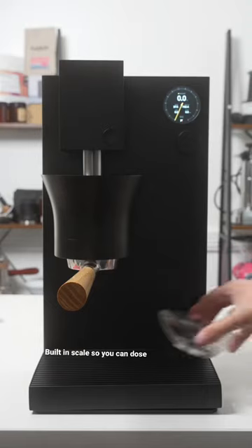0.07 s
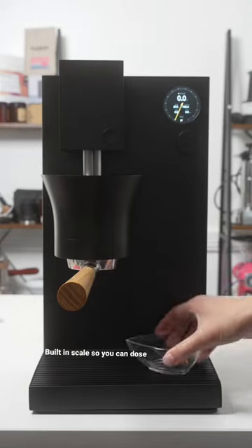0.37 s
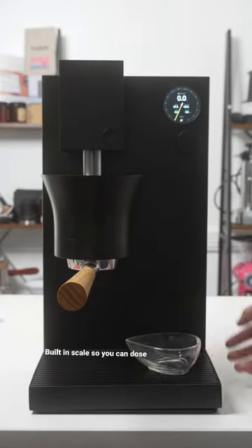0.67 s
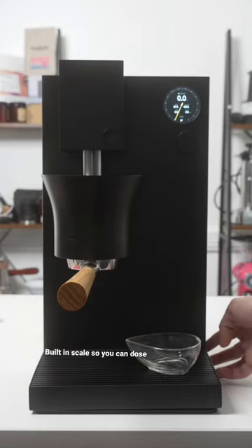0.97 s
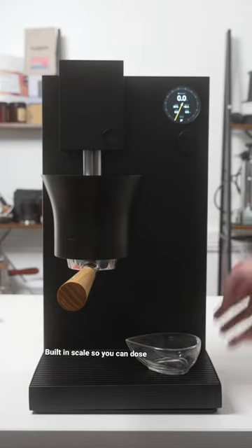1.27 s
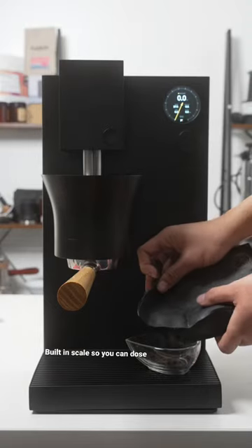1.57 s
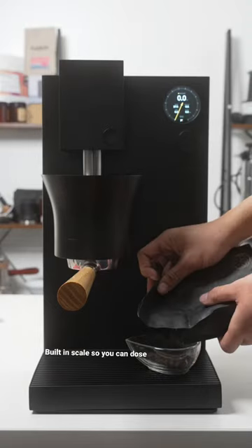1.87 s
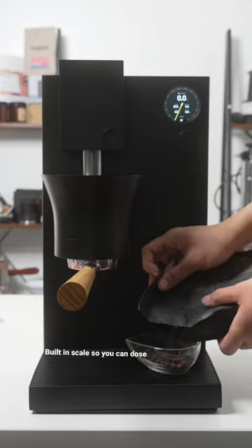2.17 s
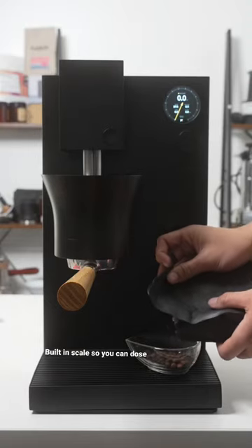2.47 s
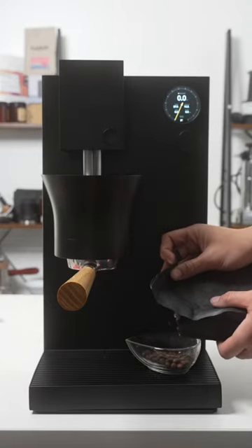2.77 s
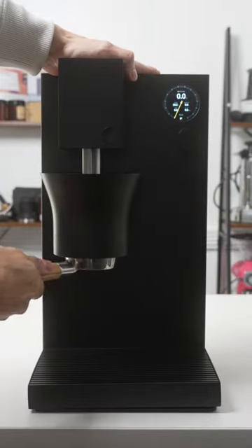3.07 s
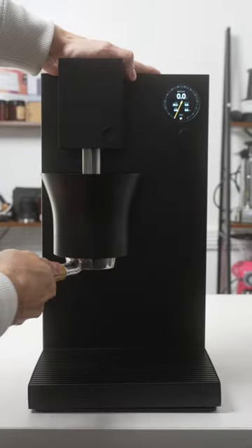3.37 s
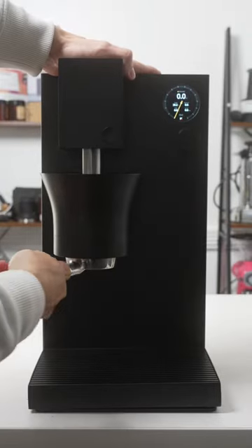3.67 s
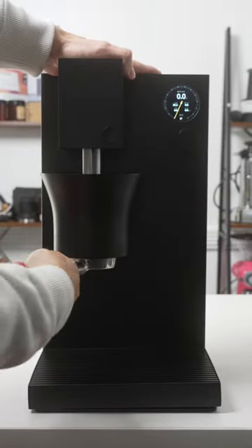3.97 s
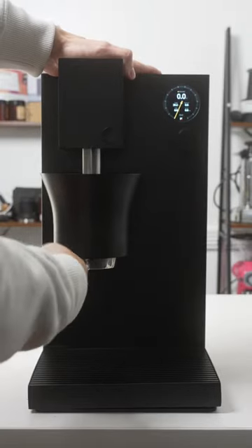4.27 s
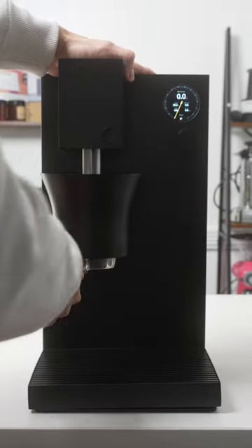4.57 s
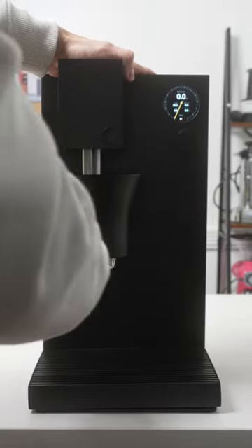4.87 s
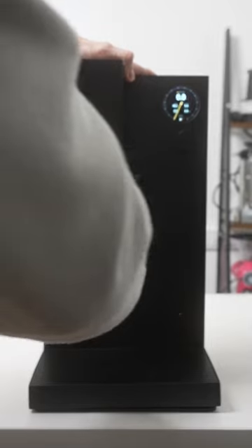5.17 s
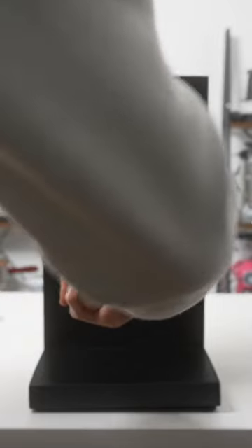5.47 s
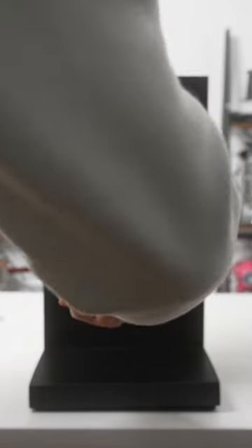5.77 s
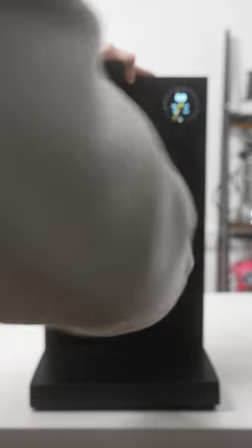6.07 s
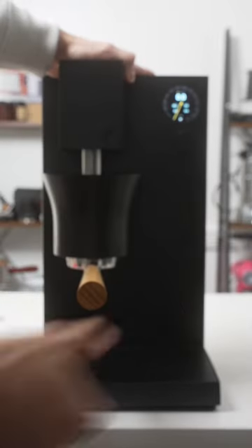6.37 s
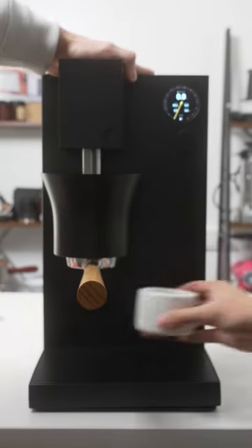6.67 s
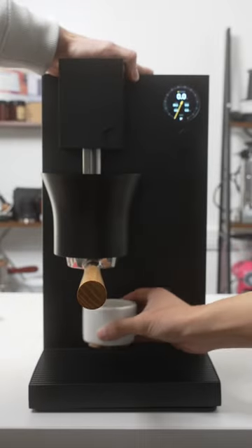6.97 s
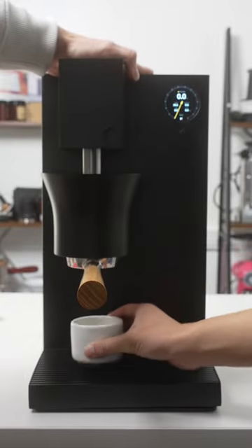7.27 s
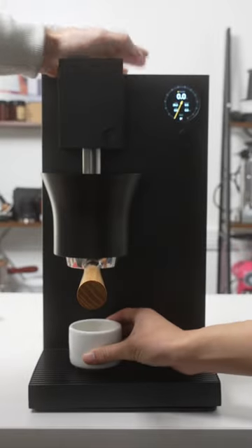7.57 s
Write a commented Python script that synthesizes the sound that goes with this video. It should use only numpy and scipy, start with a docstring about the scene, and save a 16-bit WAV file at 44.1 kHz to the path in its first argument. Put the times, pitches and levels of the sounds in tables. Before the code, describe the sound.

A faint, brief hiss opens the sound. At about 0.2 seconds a small glass dish clatters onto an espresso machine's drip tray, the loudest impact, rocking to rest with a faint ring. A button clicks down and up at around 1.1 and 1.2 seconds. From 1.5 to 2.6 seconds coffee beans slide off a scoop and patter into the dish with bright glassy clinks, thinning to a trickle. Near 2.9 seconds a metal portafilter knocks several times quickly in its holder, and the machine gives a low thump. From about 3.6 to 6.7 seconds a sleeve rustles softly among light finger taps, with a tiny rising handle squeak at 5.1 and a stronger rub and bump near 5.5. At 7.4 seconds a china cup clinks onto the tray and settles. Everything sounds close, in a quiet room with a faint, steady fan.

```python
"""A brief hiss, then a small glass dish clatters onto an espresso machine's drip tray in a quiet room.
A button clicks. Coffee beans slide off a scoop and patter into the dish, a shower of tiny impacts
that excites the modes of the glass. The portafilter knocks in its holder, the machine thumps, a sleeve
rustles, the handle squeaks by stick-slip friction, and a china cup lands on the tray.
Each knock is an impulse followed by damped free vibration; a distant fan sounds throughout."""
import sys
import numpy as np
from scipy import signal
from scipy.fft import rfft, irfft, next_fast_len
from scipy.io import wavfile

SR = 44100
rng = np.random.default_rng(int(sys.argv[2]) if len(sys.argv) > 2 else 0)


def digitize_waveform(pressure):
    """Quantize a signal to 16-bit integers and store it at the path in sys.argv[1].

    Rows of a 2-D input are taken as channels; values are limited to [-1, 1].
    """
    field = np.atleast_2d(pressure).T
    bounded = np.clip(field, -1, 1)
    quanta = np.round(bounded * 32767).astype(np.int16)
    wavfile.write(sys.argv[1], SR, quanta)


N = 340452
TIME = np.arange(N) / SR
AGE = np.arange(SR) / SR  # seconds since an impact


def amp(db):
    """Amplitude ratio of a level in decibels."""
    return 10 ** (np.asarray(db) / 20)


def unit(x):
    """Normalisation to rms 1."""
    return x / np.sqrt(np.mean(x ** 2) + 1e-20)


def unit_hit(x):
    """Normalisation to the energy of 10 ms at rms 1."""
    return x / np.sqrt(np.sum(x ** 2) / (SR / 100) + 1e-20)


def read(points, hz):
    """Interpolation of (f/Hz, value) rows over log frequency."""
    f, value = np.transpose(points)
    return np.interp(np.log(hz + 1), np.log(f + 1), value)


def since(s):
    """Time elapsed since s, zero before it."""
    return np.maximum(TIME - s, 0)


def ramp(s, rise_s):
    """Linear rise from 0 to 1, starting at time s."""
    return np.minimum(since(s) / max(rise_s, 1e-4), 1)


def swell(middle_s, length_s):
    """Raised-cosine envelope."""
    return np.cos(np.pi * np.clip((TIME - middle_s) / length_s, -.5, .5)) ** 2


def burst(s, rise_s, length_s, fall_db_per_s):
    """Exponential decay with equal linear attack and release."""
    return ramp(s, rise_s) * amp(-fall_db_per_s * since(s)) * (1 - ramp(s + length_s, rise_s))


def fade(t60):
    """Exponential decay, 60 dB in t60 seconds."""
    return np.exp(-np.log(1000) * AGE / max(t60, 1e-4))


def add(mix, s, sound):
    """Superposition of a sound starting at time s."""
    part = mix[round(s * SR):][:len(sound)]
    part += sound[:len(part)]


def colour(x, spectrum, tilt_db=0):
    """Minimum-phase filter with the given spectrum, tilted per octave."""
    hz = abs(np.fft.fftfreq(4096, 1 / SR))
    octaves = np.log2(np.maximum(hz, spectrum[0][0]))
    log_gain = np.log(amp(read(spectrum, hz) + tilt_db * octaves))
    taps = np.fft.ifft(np.exp(np.conj(signal.hilbert(log_gain)))).real
    return signal.oaconvolve(x, taps[:len(taps) // 2])[:len(x)]


def resonate(x, hz, width_hz):
    """Forced response of a unit-gain resonator of fixed or moving frequency."""
    phasor = np.exp(2j * np.pi * np.cumsum(hz * np.ones(N)) / SR)
    pole = np.exp(-np.pi * width_hz / SR)
    return 2 * (phasor * signal.lfilter([1 - pole], [1, -pole], x / phasor + 1e-18)).real


def ring(modes, tilt_db=0, scatter_db=2):
    """Free vibration: damped modes whose balance depends on the point struck."""
    offsets_db = scatter_db * rng.standard_normal(len(modes))
    return sum(amp(db + offset + tilt_db * np.log2(hz / 1500)) * fade(t60) * np.sin(2 * np.pi * hz * AGE)
               for (hz, db, t60), offset in zip(modes, offsets_db))


def knocks(blows, spectrum, modes, ring_db, snap, shiver_db, shiver_t60):
    """Impact response: an impulse, a crack of dense modes, a shiver of the housing, a few long modes."""
    out = np.zeros(N)
    for s, db, tilt_db, t60 in blows:
        crack = unit_hit(rng.standard_normal(SR) * fade(t60))
        shiver = unit_hit(rng.standard_normal(SR) * fade(shiver_t60))
        contact = snap * unit_hit(signal.unit_impulse(SR)) + crack + amp(shiver_db) * shiver
        body = unit_hit(colour(contact, spectrum, tilt_db))
        add(out, s, amp(db) * (body + amp(ring_db) * ring(modes, tilt_db / 2)))
    return out


def grains(spectrum, per_s, spread_db, band_hz, cycles):
    """Shot noise at rms 1: random tiny collisions, each dying away in a number of cycles."""
    out = np.zeros(N)
    pitches = np.geomspace(*band_hz, 32)
    for hz in pitches:
        when, chance = rng.random((int(per_s / len(pitches) * N / SR), 2)).T
        size = amp(spread_db * np.minimum(-np.log(1 - chance), 3))
        t = AGE[AGE < min(cycles / hz, .05)]
        decay = np.exp(-np.log(1000) * t * hz / cycles)
        grain = rng.choice([-1, 1]) * hz * decay * np.sin(2 * np.pi * hz * t)
        samples = (when * N).astype(int)[:, None] + np.arange(len(t))
        out += np.bincount(samples.ravel(), np.outer(size, grain).ravel(), N)[:N]
    return unit(colour(out, spectrum))


# Reverberation time: f/Hz, T60/s
REVERB_TIMES = [(100, 0.59), (400, 0.41), (1000, 0.29), (3000, 0.35), (6000, 0.19), (12000, 0.24)]
def room(x, wet_db):
    """Reverberation: sparse reflections whose treble is absorbed first."""
    reflections = rng.choice([-1., 1.], SR) * (rng.random(SR) < .1) * (AGE > .004)
    hz, t, spectra = signal.stft(reflections, SR, nperseg=256)
    decay = np.exp(-np.log(1000) * t / read(REVERB_TIMES, hz)[:, None])
    tail = signal.istft(spectra * decay, SR, nperseg=256)[1]
    return x + amp(wet_db) * signal.oaconvolve(x, tail / np.linalg.norm(tail))[:N]


# Room tone: f/Hz, level/dB
AIR_SPECTRUM = [(15, -49.5), (25, -10.5), (59, -18), (99, -7), (185, -10), (263, -5), (326, -13.5),
                (427, -7), (503, -11), (754, -7), (988, -13.5), (1160, -6), (2550, -22), (4250, -25.5),
                (16000, -31)]
# Fan resonances: f/Hz, width/Hz, level/dB
FAN_BANDS = [(361, 49, -76.5), (440, 51, -76), (766, 30, -76.5), (1140, 140, -90), (4270, 590, -80.5),
             (5460, 340, -85.5)]
def room_tone():
    """Stationary noise: a broad floor plus the resonance bands of a distant fan."""
    out = amp(-63.5) * unit(colour(rng.standard_normal(N), AIR_SPECTRUM))
    size = next_fast_len(N, True)
    bins = np.fft.rfftfreq(size, 1 / SR)
    for hz, width, db in FAN_BANDS:
        band = rfft(rng.standard_normal(size)) / (1 + (2 * (bins - hz) / width) ** 2)
        out += amp(db) * unit(irfft(band, size)[:N])
    return out


# Opening hiss: f/Hz, level/dB
HISS_SPECTRUM = [(1000, -26), (3200, -1), (4500, 5), (5600, 13.5), (6400, 4), (7300, -5), (11000, -14.5),
                 (15000, -39)]
def hiss():
    """A brief band of high noise in exponential decay."""
    noise = unit(colour(rng.standard_normal(N), HISS_SPECTRUM))
    return amp(-51) * burst(.035, rise_s=.004, length_s=.13, fall_db_per_s=115) * noise


# Soft rub and fine swish of cloth: f/Hz, level/dB
RUB_SPECTRUM = [(70, -25.5), (160, -1.5), (260, -9.5), (350, -6.5), (430, -3), (510, 5.5), (620, -5.5),
                (760, 4.5), (900, -9.5), (1200, -9.5), (1700, -27), (4000, -25)]
SWISH_SPECTRUM = [(900, -37), (1800, 2), (3000, 1), (4800, -4), (7000, -20), (15000, -23)]
# Strokes of sleeve and hands: middle t/s, length/s, rub level/dB, swish level/dB
SLEEVE_STROKES = [(3.894, 0.26, -60, -68.5), (4.06, .14, -62, -73), (4.31, .16, -62.5, -71),
                  (4.733, 0.15, -63.5, -70.5), (4.843, 0.15, -58, -69), (4.974, 0.2, -56.5, -64.5),
                  (5.27, 0.16, -55, -61), (5.386, .14, -55, -66), (5.471, 0.15, -47.5, -57),
                  (5.663, 0.13, -62, -69.5), (6.1, 0.23, -67, -70), (6.37, 0.11, -67, -65.5),
                  (6.674, .18, -69, -68.5)]
def sleeve():
    """Friction noise: cloth rubs softly while its fibres catch in a fine swish."""
    rub = grains(RUB_SPECTRUM, per_s=1500, spread_db=3, band_hz=(85.3, 4030), cycles=12.7)
    swish = grains(SWISH_SPECTRUM, per_s=2000, spread_db=3, band_hz=(1055, 15200), cycles=16)
    return sum(swell(s, length) * (amp(rub_db) * rub + amp(swish_db) * swish)
               for s, length, rub_db, swish_db in SLEEVE_STROKES)


# Fingers and cuff: t/s, level/dB, tilt/(dB/octave), crack T60/s
TOUCH_IMPACTS = [(.645, -67, 7, 0.082), (.879, -65.5, 12, 0.03), (3.636, -66, 9.5, .04),
                 (3.908, -54, -4, .04), (4.288, -58, 4.5, 0.051), (5.428, -47.5, 0.5, 0.21),
                 (5.675, -63.5, 12, .02), (5.954, -59.5, -4.5, .04), (6.154, -62, 4, .03),
                 (6.522, -63, 9, 0.017)]
# Contact spectrum: f/Hz, level/dB
TOUCH_SPECTRUM = [(80, -1), (200, -20), (600, 6), (1300, -8), (3000, -8.5), (7000, -23), (16000, -41)]
# Modes of the touched surface: f/Hz, level/dB, T60/s
TOUCH_RING = [(472, -8, 0.17), (756, 6.5, 0.12), (1144, 0.5, 0.17), (2940, -18, .06)]
def touches():
    """Weak impacts of fingers and cuff excite a few damped modes."""
    return knocks(TOUCH_IMPACTS, TOUCH_SPECTRUM, TOUCH_RING,
                  ring_db=-6.5, snap=.45, shiver_db=-6, shiver_t60=.12)


def handle_squeak():
    """Stick-slip friction: uneven slips drive two resonances that rise as the handle turns."""
    start_s, length_s, slips_per_s = 5.118, .088, 2500
    start_hz, glide_hz_per_s = 1690, 4400
    slips = rng.standard_normal(N) * (rng.random(N) < slips_per_s / SR)
    pitch = start_hz + glide_hz_per_s * np.minimum(since(start_s), length_s)
    tone = resonate(resonate(slips, pitch, width_hz=800), pitch, width_hz=800)
    overtone = resonate(slips, pitch * 1.4, width_hz=140)
    envelope = burst(start_s, rise_s=.024, length_s=length_s, fall_db_per_s=110)
    return amp(-53) * envelope * unit(tone + .84 * overtone)


# Blows to the machine's body: t/s, level/dB, tilt/(dB/octave), crack T60/s
BODY_IMPACTS = [(3.0175, -33, -1, 0.077), (3.029, -53, -9, 0.056), (3.29, -58, 4.5, 0.071),
                (5.445, -58, -1.5, 0.092), (5.495, -47.5, 3, 0.064), (6.1, -59, -1.5, 0.2)]
# Thump spectrum: f/Hz, level/dB
BODY_SPECTRUM = [(40, 11), (80, -32), (160, 11), (250, -7), (360, 7.5), (600, -11), (1500, -43),
                 (6000, -54)]
# Body modes: f/Hz, level/dB, T60/s
BODY_RING = [(80, -13, .22), (128, -8, .2), (160, -12, .65), (176, -13, .17), (358, -10, .16)]
def machine_thumps():
    """The machine's body answers each blow in its low modes."""
    return knocks(BODY_IMPACTS, BODY_SPECTRUM, BODY_RING,
                  ring_db=4, snap=.78, shiver_db=-3, shiver_t60=.32)


# Press and release: t/s, level/dB, tilt/(dB/octave), crack T60/s
BUTTON_IMPACTS = [(1.0695, -31, 1, 0.0092), (1.19, -56.5, -1.5, .016), (1.2122, -36.5, -1.5, 0.0042)]
# Click spectrum: f/Hz, level/dB
BUTTON_SPECTRUM = [(100, -48), (350, -16), (750, -0.5), (1050, -7), (1700, 0), (2600, -15), (3400, -7.5),
                   (4000, -9.5), (6200, -5.5), (7500, -19), (10000, -21), (11600, -14), (13000, -25),
                   (16000, -24)]
# Button modes: f/Hz, level/dB, T60/s
BUTTON_RING = [(730, -15, .07), (790, -17, .06), (1260, -15, .045), (1690, -5, .03), (6230, -13, .035),
               (11600, -22, .07)]
def button_clicks():
    """Heavy damping cuts the button's impacts down to clicks."""
    return knocks(BUTTON_IMPACTS, BUTTON_SPECTRUM, BUTTON_RING,
                  ring_db=-.5, snap=.43, shiver_db=-5, shiver_t60=.055)


# Portafilter against holder: t/s, level/dB, tilt/(dB/octave), crack T60/s
HOLDER_IMPACTS = [(2.884, -57, -10, .06), (2.903, -43.5, -9.5, 0.054), (2.9152, -28.5, 3, 0.023),
                  (2.922, -29, 0.5, 0.048), (2.9275, -33, -5.5, 0.061), (2.957, -42, -9, 0.059),
                  (3.003, -44, 3.5, 0.07), (3.0168, -31.5, -1, 0.0013), (3.0345, -48, 9, 0.006),
                  (3.047, -41, 1, 0.019)]
# Contact spectrum: f/Hz, level/dB
HOLDER_SPECTRUM = [(60, -40), (160, -12), (240, -23), (420, -1), (650, 0), (1250, 9.5), (2000, 0.5),
                   (2900, -0.5), (3800, -9), (4750, 1), (6000, -17.5), (9500, -36), (12000, -30),
                   (16000, -50)]
# Modes of portafilter and holder: f/Hz, level/dB, T60/s
HOLDER_RING = [(415, -11, .22), (517, -9, .13), (760, -11, .12), (1240, -11, .16), (1561, -17, .17),
               (2202, -26, .2), (2864, -29, .2), (4715, -9, .03)]
def portafilter():
    """Impact excitation: the portafilter meets its holder in a quick run of knocks."""
    return knocks(HOLDER_IMPACTS, HOLDER_SPECTRUM, HOLDER_RING,
                  ring_db=0, snap=.53, shiver_db=-7.5, shiver_t60=.031)


# Cup against tray: t/s, level/dB, tilt/(dB/octave), crack T60/s
CUP_IMPACTS = [(7.3946, -36, 7.5, 0.013), (7.3968, -37.5, -2, 0.014), (7.402, -39, -2, 0.058),
               (7.421, -39.5, -4, 0.036), (7.465, -44.5, -1.5, 0.14), (7.483, -45, -3.5, 0.035),
               (7.505, -54, -2.5, .08), (7.59, -52.5, -1, 0.52)]
# Contact spectrum: f/Hz, level/dB
CUP_SPECTRUM = [(60, -25), (190, -7), (350, 8), (550, -2), (900, 0.5), (1400, 7.5), (1900, -3.5),
                (2500, 7.5), (3100, -7.5), (4300, 1), (5300, -1), (6500, -18), (9200, -16), (16000, -36)]
# Modes of the cup on the tray, and of its hard foot: f/Hz, level/dB, T60/s
CUP_RING = [(185, -11, .14), (361, -15, .33), (877, -11, .17), (1394, -17, .22), (2487, -23, .26),
            (4177, -17, .08), (4371, -20, .17), (4657, -24, .4), (4980, -24, .25), (9141, -27, .15)]
FOOT_RING = [(5280, 6, 0.023), (5660, 1, 0.014), (6000, -17, 0.0084)]
def cup_landing():
    """Inelastic impacts settle the cup; only the first two are hard enough to make its foot chirp."""
    out = knocks(CUP_IMPACTS, CUP_SPECTRUM, CUP_RING,
                 ring_db=1.5, snap=.089, shiver_db=-.5, shiver_t60=.11)
    for s, db, _, _ in CUP_IMPACTS[:2]:
        add(out, s, amp(db + 10) * ring(FOOT_RING, scatter_db=2.5))
    return out


# Dish against tray: t/s, level/dB, tilt/(dB/octave), crack T60/s
DISH_IMPACTS = [(0.2291, -21, -0.65, 0.036), (0.2321, -29.5, 4, 0.022), (.238, -29, -2.5, 0.028),
                (0.271, -31.5, 2, 0.028), (0.2737, -32.5, -3, 0.077), (.305, -39.5, -5, 0.065),
                (0.3186, -34, -0.5, 0.074), (0.335, -39.5, -2, 0.097), (0.364, -47.5, -4.5, 0.032),
                (.408, -52.5, -3, 0.079)]
# Contact spectrum: f/Hz, level/dB
DISH_SPECTRUM = [(60, -36.5), (180, -9), (270, -17), (440, -2.5), (800, -2.5), (1100, -9), (2000, -10.5),
                 (2450, 0), (3200, -5), (4800, -16.5), (6600, -4), (8500, -27), (12500, -21), (16000, -32)]
# Joint modes of dish and tray, and the long after-ring: f/Hz, level/dB, T60/s
TRAY_RING = [(400, -28, .75), (445, -19, .38), (779, -7, .15), (859, -15, .26), (910, -12, .2),
             (1257, -18, .22), (2398, -20, .14), (2448, -11, .16), (2650, -17, .17), (3266, -20, .2),
             (3445, -20, .18), (4146, -21, .25), (5276, -28, .24), (6692, -14, .12)]
AFTER_RING = [(1475, -13, 1.1), (1556, -9, 1.6), (1707, -9, 1.0), (1800, -8, 1.2), (1826, -3, 1.25),
              (4912, -9, .7)]
def dish_landing():
    """The dish rocks to rest; lightly damped modes ring on faintly from the first impact."""
    out = knocks(DISH_IMPACTS, DISH_SPECTRUM, TRAY_RING,
                 ring_db=-1, snap=.13, shiver_db=-12.5, shiver_t60=.12)
    add(out, DISH_IMPACTS[0][0], amp(-45) * ring(AFTER_RING, scatter_db=1))
    return out


# Beans striking the glass wall: t/s, level/dB, relative twin level/dB
WALL_STRIKES = [(1.5772, -39.5, -12), (1.665, -37, -22), (1.7647, -38.5, -11), (1.792, -33, -9),
                (1.825, -31.5, -15), (1.9255, -32.5, 4.5), (2.0142, -35.5, -7), (2.1449, -39.5, -8),
                (2.1808, -42, -13), (2.3429, -41.5, -18), (2.3714, -37.5, -17), (2.396, -40, -25)]
# Modes of the glass, and their twins: f/Hz, level/dB, T60/s
GLASS_RING = [(2887, -20, .4), (4956, 0, .34), (7989, -9, .23), (10605, -19, .19), (11703, -11, .18),
              (13851, -5, .17), (15385, -6, .11)]
TWIN_RING = [(2681, -11, .22), (5286, -1, .16), (8403, -5, .11), (14578, -10, .1)]
def glass_clinks():
    """Mode splitting: the oval dish rings in two sets; the growing heap muffles the main set's highs."""
    out = np.zeros(N)
    strongest_hz = GLASS_RING[1][0]
    for s, db, twin_db in WALL_STRIKES:
        muffle_db_per_octave = 6 * np.clip((s - 2) / .4, 0, 1)
        modes = [(hz, mode_db - muffle_db_per_octave * max(np.log2(hz / strongest_hz), 0), t60)
                 for hz, mode_db, t60 in GLASS_RING]
        clink = ring(modes, scatter_db=1) + amp(twin_db) * ring(TWIN_RING, scatter_db=1.5)
        add(out, s, amp(db) * clink)
    return out


POUR_START_S, POUR_FULL_S, POUR_THIN_S, POUR_EMPTY_S, POUR_END_S = 1.453, 1.56, 2.03, 2.35, 2.63
LAND_S, LAND_RISE_S = 1.65, .11  # the stream reaches the glass and builds up there
def flow_db():
    """Flow level relative to the full stream: it swells as the scoop tips, holds, thins and stops."""
    swell_db_per_s, thin_db_per_s, stop_db_per_s = 19, 32.5, 170
    return -(swell_db_per_s * np.maximum(POUR_FULL_S - TIME, 0)
             + thin_db_per_s * since(POUR_THIN_S) + stop_db_per_s * since(POUR_EMPTY_S))


def bean_hit(hz):
    """An impulse and a brief rattle of neighbouring beans, filtered to a peak at hz."""
    t60 = .006 + 8 / hz  # low knocks outlast high snaps
    band = [(hz / 5, -34), (hz / 2, -20), (hz / 1.13, -3), (hz * .92, -6),
            (hz, 0), (hz * 1.6, -14), (hz * 9, -42)]
    rattle = unit_hit(rng.standard_normal(SR) * fade(t60))
    contact = unit_hit(signal.unit_impulse(SR)) + 1.6 * rattle
    return unit_hit(colour(contact, band))


# Snaps on glass (high) and knocks on scoop and heap (low): t/s, level/dB, f/Hz
BEAN_IMPACTS = [(1.5227, -39.5, 1200), (1.5562, -38.5, 1010), (1.5772, -33, 15200), (1.581, -39.5, 1120),
                (1.632, -44.5, 2600), (1.653, -42, 1320), (1.664, -38, 14000), (1.7075, -32, 1080),
                (1.719, -39, 3250), (1.7395, -37, 11100), (1.7495, -37, 12500), (1.7618, -37, 10500),
                (1.777, -36, 13900), (1.8268, -26.5, 14900), (1.836, -41.5, 6000), (1.891, -42, 14300),
                (1.929, -35, 14500), (1.991, -36, 14000), (2.079, -32.5, 1180), (2.0955, -43, 13500),
                (2.1805, -42, 13500), (2.271, -41.5, 13800), (2.342, -39, 13400), (2.3736, -35, 14300),
                (2.445, -49, 12300), (2.515, -54.5, 1580), (2.554, -48.5, 1400), (2.565, -54.5, 1570),
                (2.585, -51, 1660), (2.618, -54, 1900)]
def hard_beans():
    """Discrete impacts: the hardest beans stand out, and random strays re-excite the glass."""
    out, flow = np.zeros(N), flow_db()
    for s, db, hz in BEAN_IMPACTS:
        add(out, s, amp(db) * bean_hit(hz))
    strays_per_s, stray_db, spread_db = 40, -38.5, 5
    low_hz, high_hz = 9900, 15100
    span_s = POUR_EMPTY_S - LAND_S - LAND_RISE_S
    for when, size, pitch in rng.random((int(strays_per_s * span_s), 3)):
        s = POUR_EMPTY_S - when * span_s
        db = stray_db + flow[round(s * SR)] + spread_db * (2 * size - 1)
        snap = bean_hit(low_hz + pitch * (high_hz - low_hz))
        add(out, s, amp(db) * (snap + amp(-9) * ring(GLASS_RING)))
    return out


# Beans sliding, pattering and crackling on glass: f/Hz, level/dB
SLIDE_SPECTRUM = [(500, -24), (1500, 11.5), (3000, -1), (4500, 0.5), (7500, -4.5), (10000, -0.5),
                  (12000, -4), (16000, -4.5)]
PATTER_SPECTRUM = [(120, -28), (300, -13.5), (600, -2.5), (1000, 1), (1700, -3), (2200, -10.5), (2900, -1),
                   (3800, -14), (6500, -18), (9000, -37), (16000, -36)]
CRACKLE_SPECTRUM = [(3000, -26), (8500, -24), (10300, -17), (12000, -6), (14000, 7), (15300, 4.5),
                    (16200, -23)]
def bean_stream():
    """Granular flow: collision noise follows the stream and drives the glass modes into a shimmer."""
    slide = grains(SLIDE_SPECTRUM, per_s=12000, spread_db=-1, band_hz=(750, 15800), cycles=5)
    patter = grains(PATTER_SPECTRUM, per_s=1400, spread_db=2, band_hz=(250, 7440), cycles=6.6)
    crackle = grains(CRACKLE_SPECTRUM, per_s=650, spread_db=5.5, band_hz=(7780, 15300), cycles=29)
    shimmer = unit(sum(amp(db) * resonate(crackle, hz, width_hz=np.log(1000) / np.pi / t60)
                       for hz, db, t60 in GLASS_RING))
    flow, landed = flow_db(), ramp(LAND_S, LAND_RISE_S)
    pouring = ramp(POUR_START_S, rise_s=.0022) * (1 - ramp(POUR_END_S, rise_s=.0092))
    pattering = patter * amp(-39 + np.maximum(flow, -20.5))  # the floor leaves a last trickle
    on_glass = (crackle + amp(-1) * shimmer) * landed ** 2 * amp(-41.5 + 1.9 * flow)
    first_slip = amp(-46) * swell(middle_s=1.527, length_s=.23)  # the heap shifts along the scoop
    sliding = slide * (landed * amp(-43.5 + .8 * flow) + first_slip)
    return pouring * (pattering + on_glass + sliding)


def scene():
    """Superposition of the sources, their reverberation and the background."""
    button = button_clicks()
    machine = portafilter() + machine_thumps()
    fingers = touches()
    mix = room(dish_landing(), wet_db=-13) + room(cup_landing(), wet_db=-10.5)
    mix += room(button, wet_db=-16) + room(machine, wet_db=-12)
    mix += room(bean_stream() + hard_beans(), wet_db=-15) + glass_clinks()
    mix += room(sleeve() + fingers + handle_squeak(), wet_db=-12)
    low_cut = signal.butter(4, 70, "high", fs=SR, output="sos")  # small things radiate no deep bass
    return (signal.sosfilt(low_cut, mix) + room_tone() + hiss())[None]


def record(dry):
    """Band limiting: the sound opens after a short silence and passes a steep 16 kHz low-pass."""
    opening = ramp(.028, rise_s=.008)
    low_pass = signal.firwin(301, 16000, window=("kaiser", 8), fs=SR)
    return signal.oaconvolve(dry * opening, low_pass[None], "same")


dry = scene()
out = record(dry)
digitize_waveform(out)
```